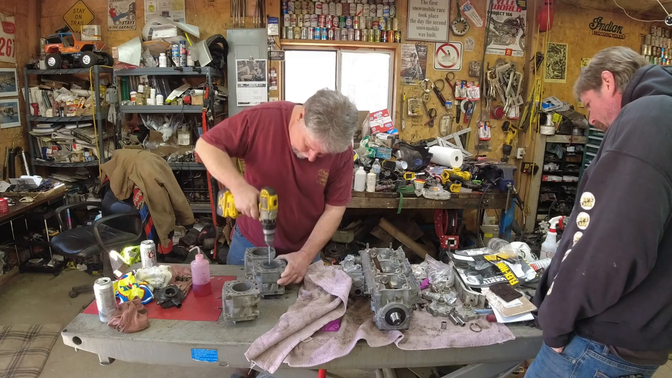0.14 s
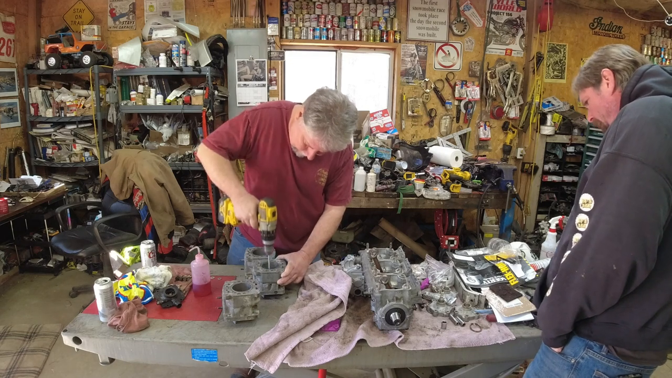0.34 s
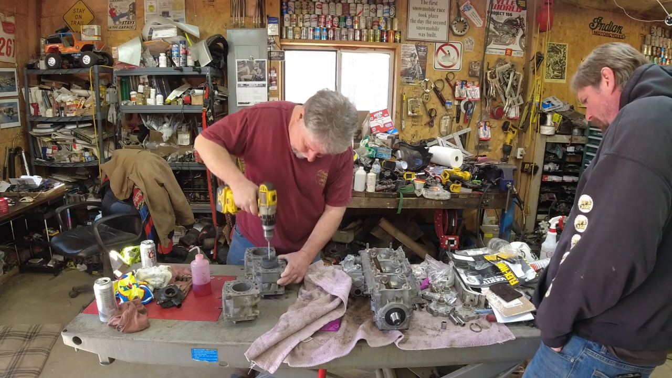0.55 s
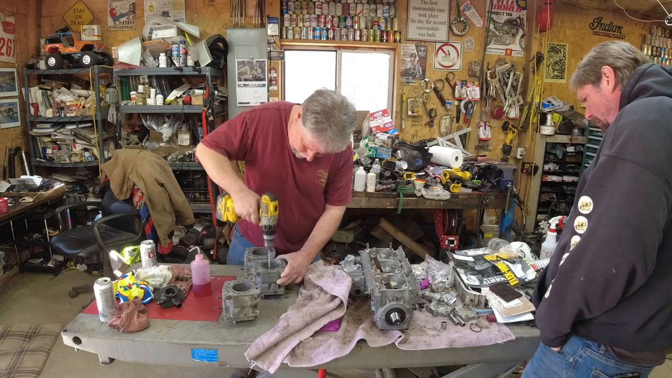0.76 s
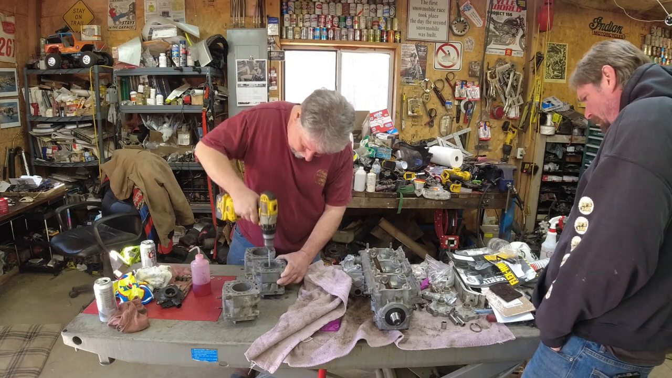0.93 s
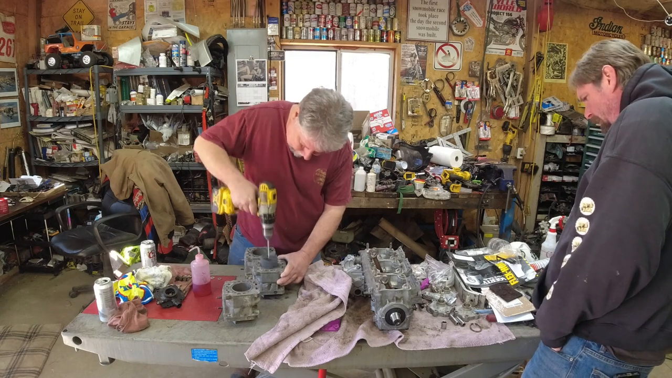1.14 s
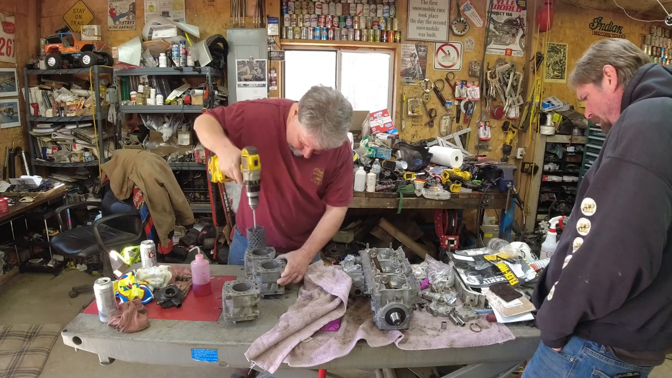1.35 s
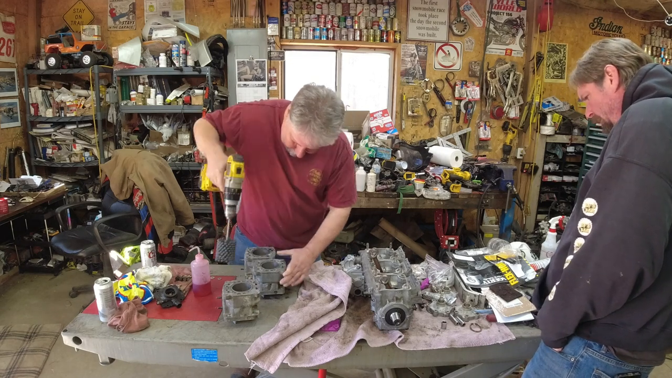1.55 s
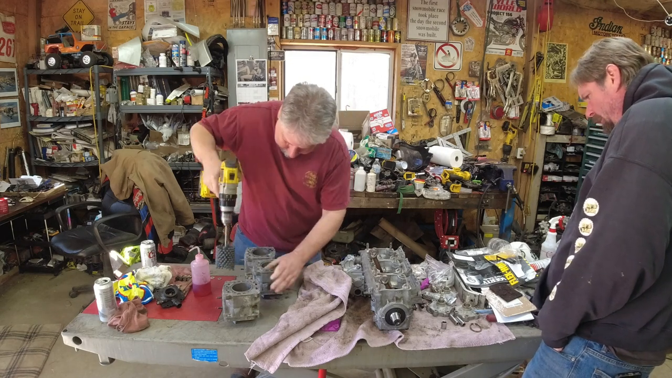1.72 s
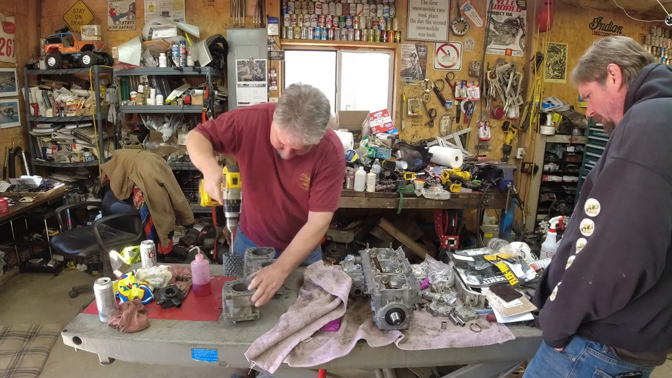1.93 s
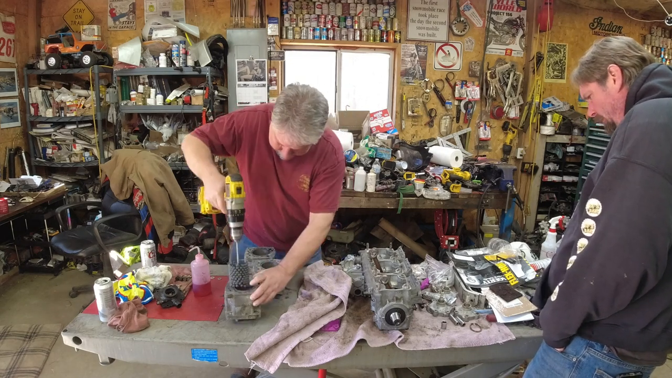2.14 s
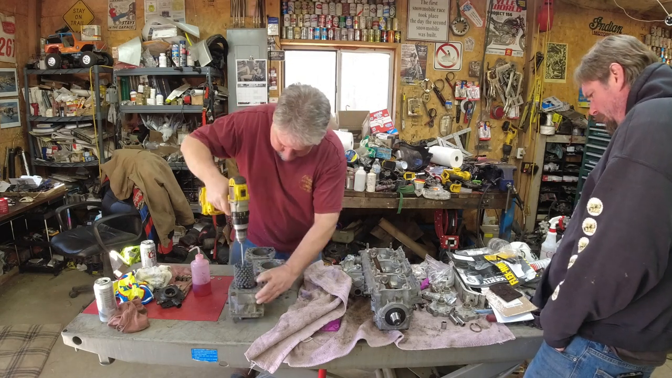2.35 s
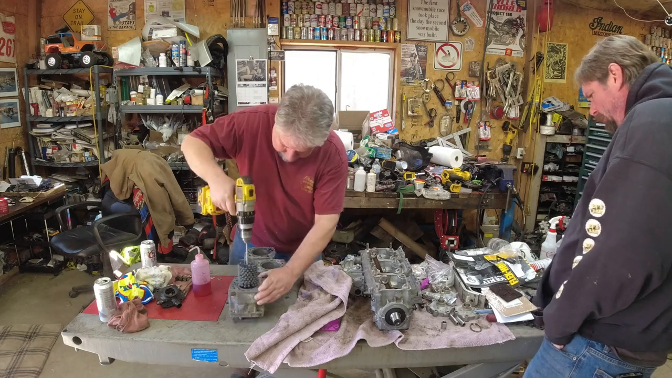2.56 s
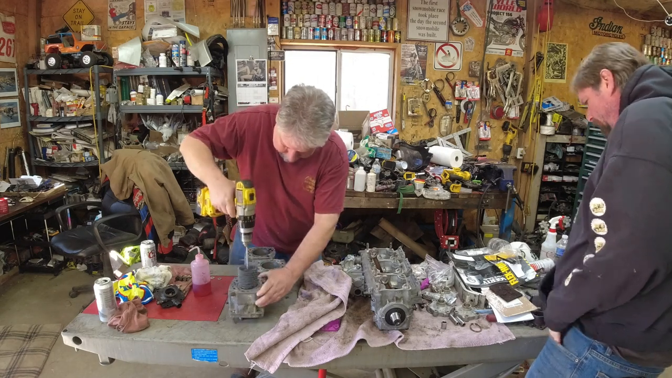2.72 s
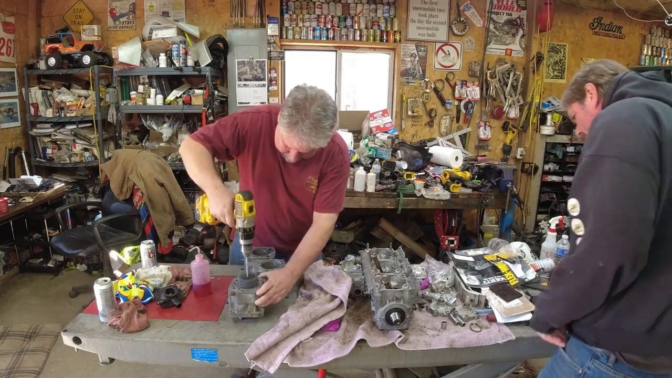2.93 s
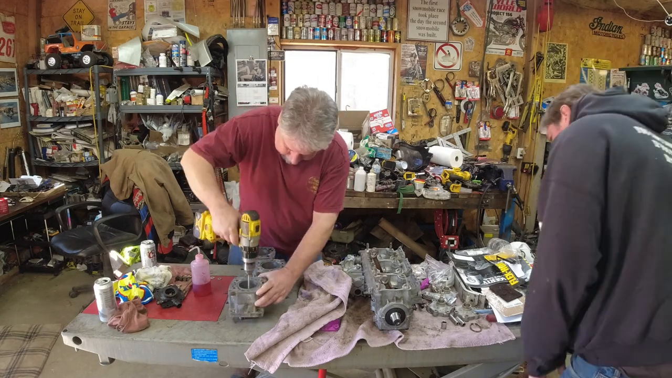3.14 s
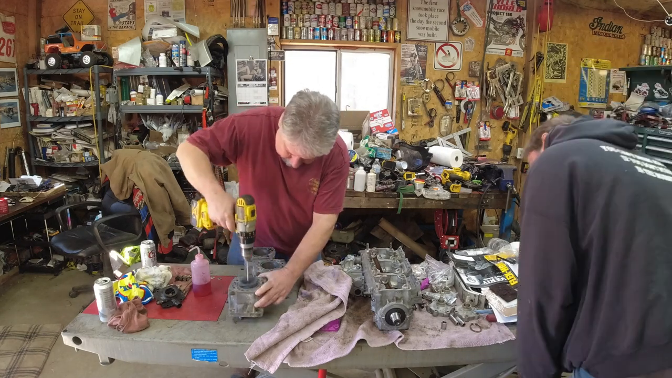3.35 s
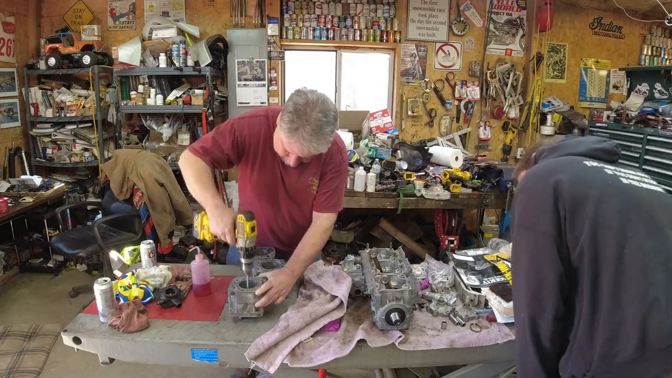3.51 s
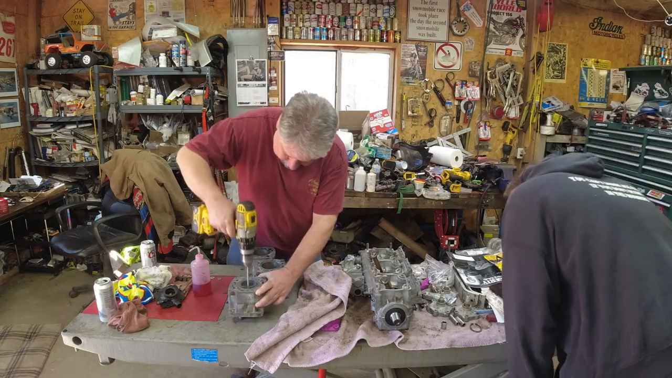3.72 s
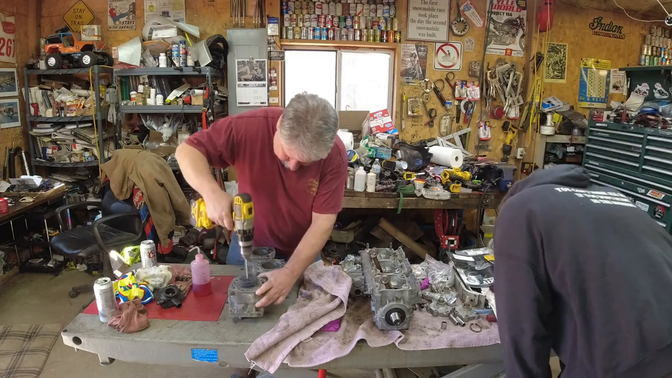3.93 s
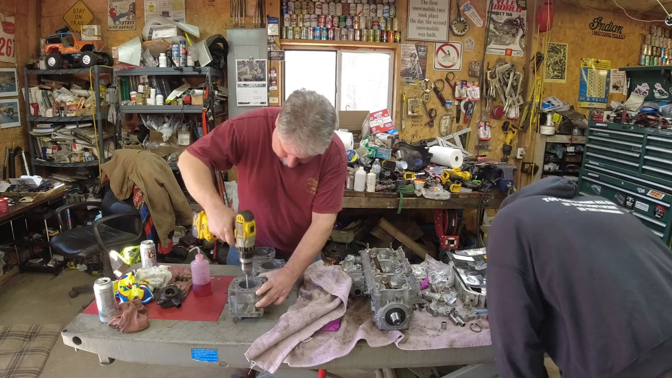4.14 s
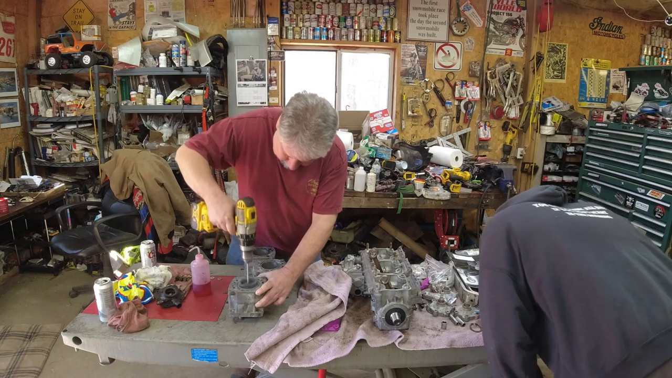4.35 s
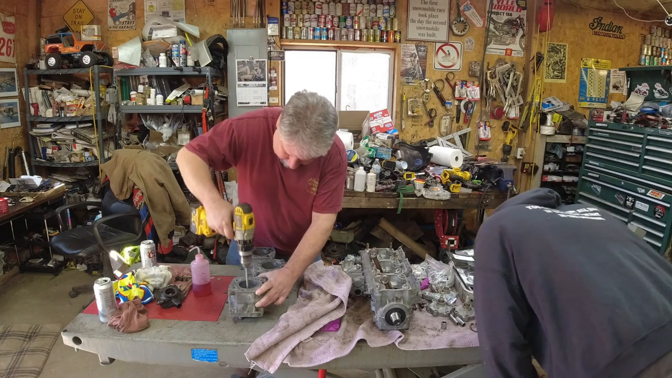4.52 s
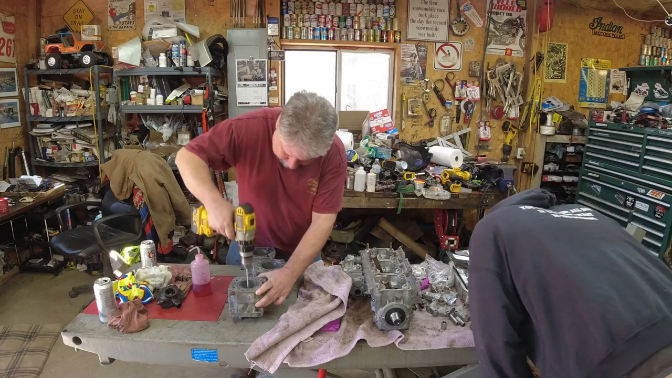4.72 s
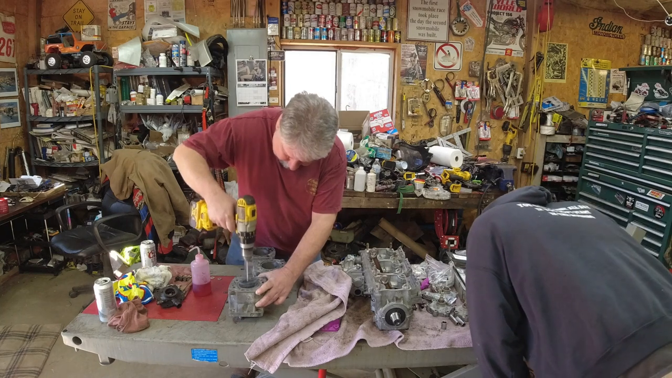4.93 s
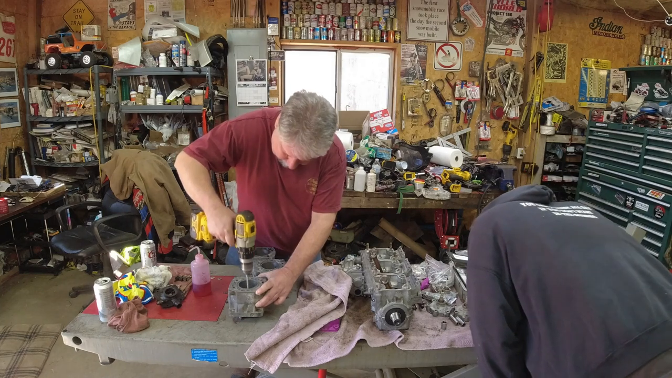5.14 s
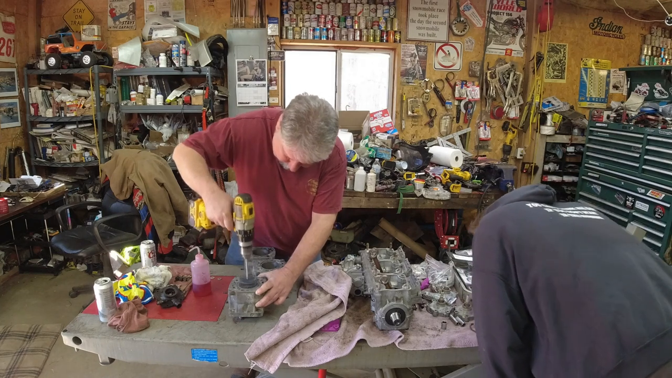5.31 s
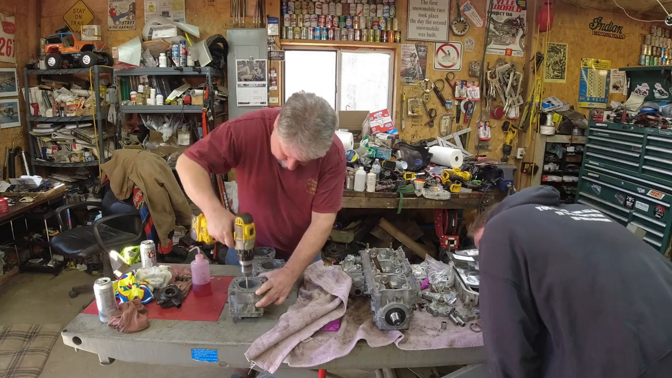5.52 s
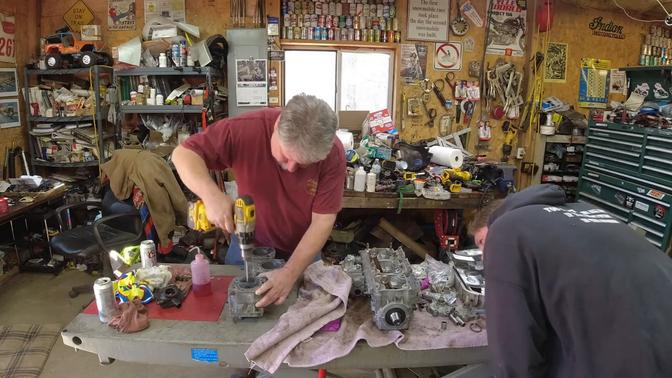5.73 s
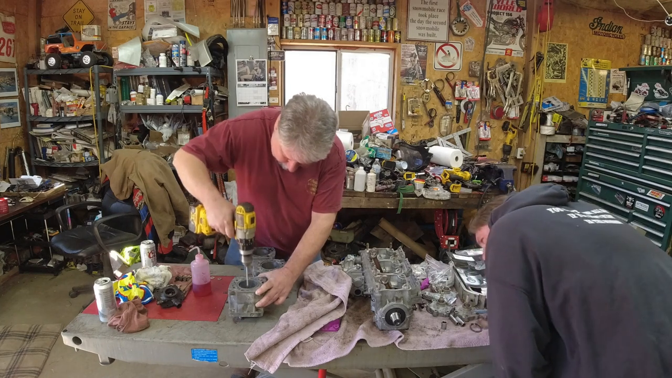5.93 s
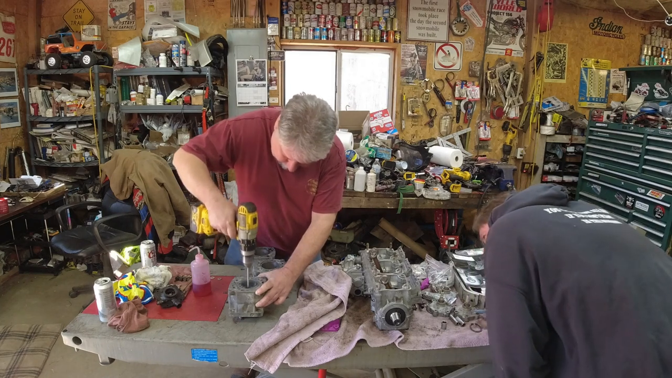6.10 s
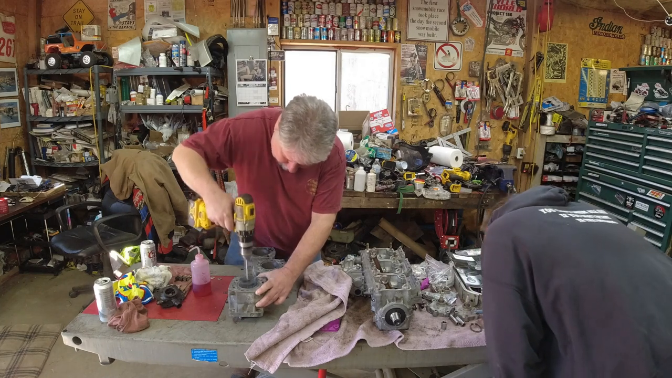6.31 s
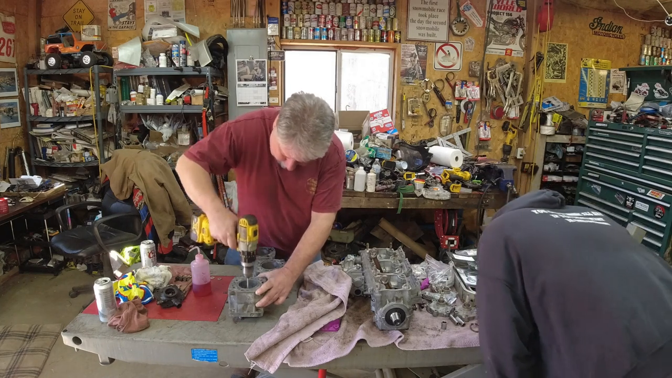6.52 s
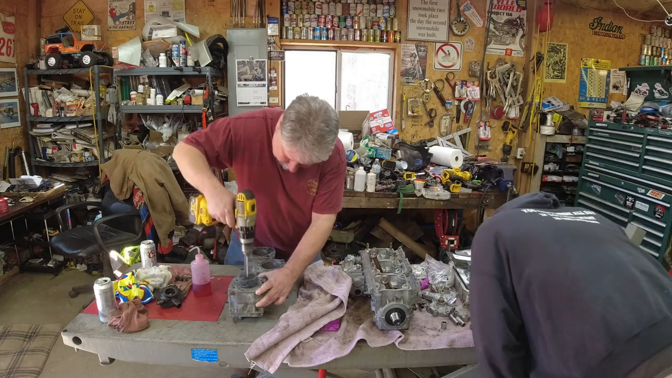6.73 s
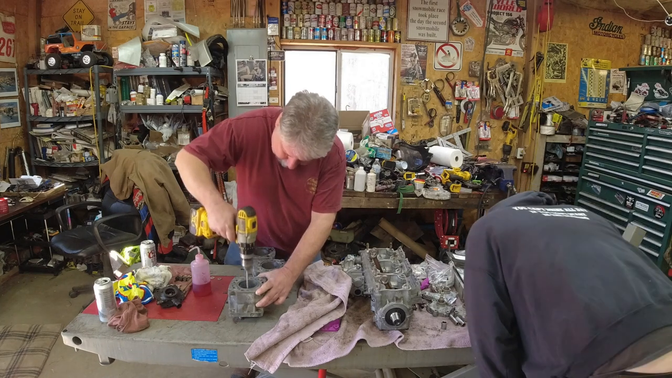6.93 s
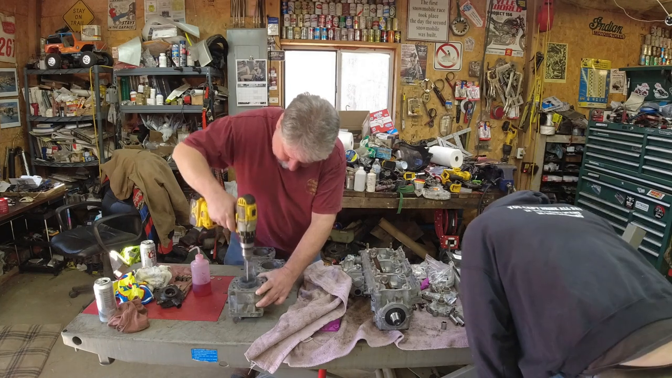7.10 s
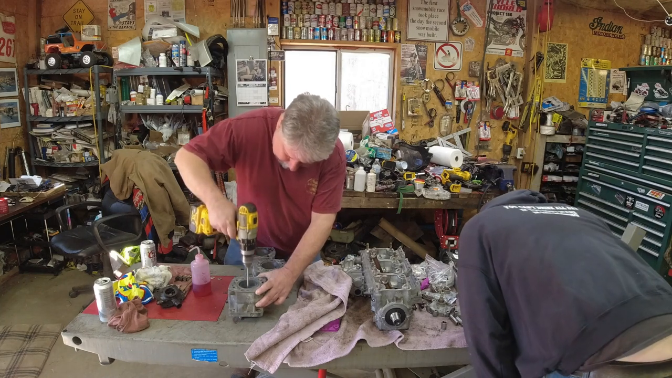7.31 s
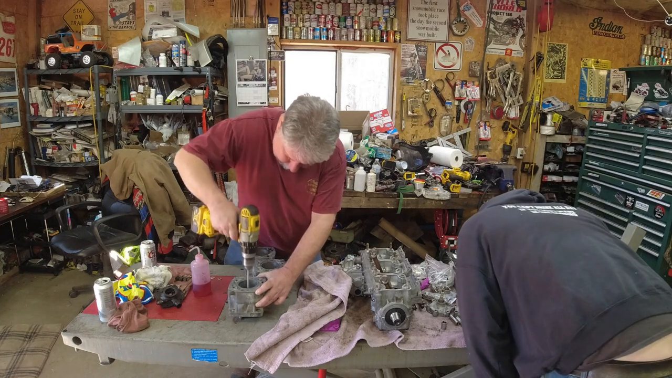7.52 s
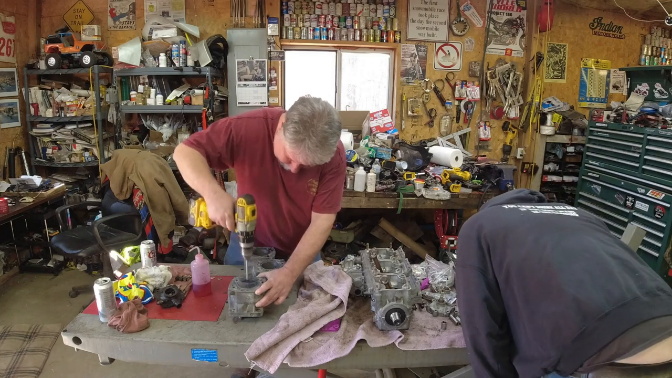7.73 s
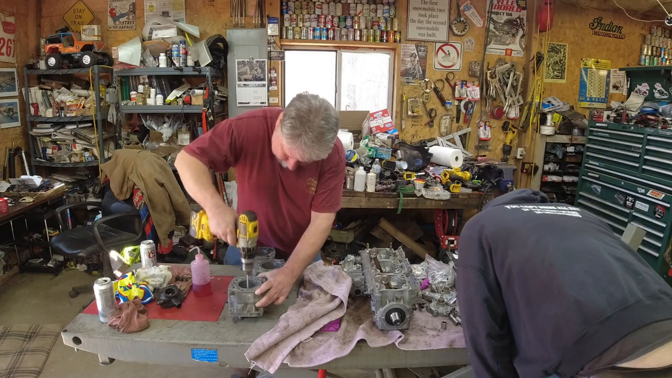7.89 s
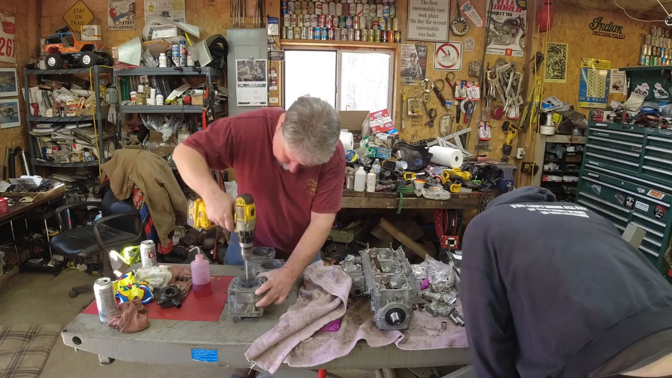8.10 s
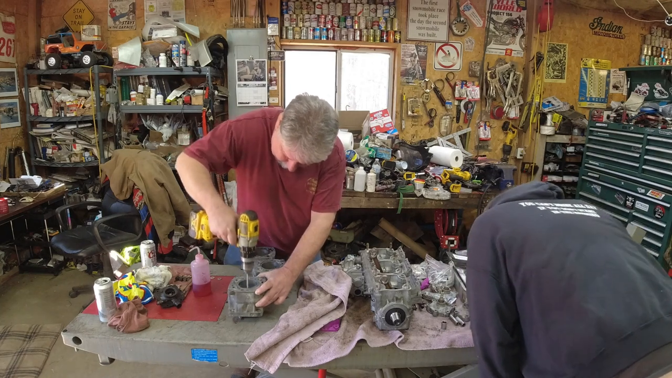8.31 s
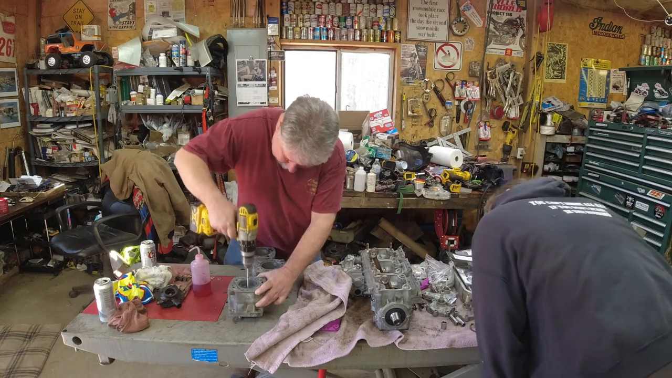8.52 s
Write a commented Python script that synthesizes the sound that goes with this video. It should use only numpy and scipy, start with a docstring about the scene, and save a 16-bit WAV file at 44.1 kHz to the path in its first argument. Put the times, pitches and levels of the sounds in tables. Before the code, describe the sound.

From 0 to 1.4 seconds a cordless drill runs already at speed, its gear whine and tooth rattle rising and sagging with quick strokes. An abrasive bead hone hisses brightly inside a metal cylinder, scraping the wall and shaking the bench; the hiss fades as it is drawn out. At 1.4 the motor brakes with a tight run of clacks. Near quiet follows, with very faint clinks and soft low rocking. Around 2.3 to 2.5 the cylinder is shoved with a short low juddering scrape, followed by light touches. At 2.9 a small clack and a rattling spin-up restart the drill. Until about 8.8 the honing continues, roughly three strokes a second, the motor bogging and recovering, with raspy catches and occasional tiny high chirps from 4.2 to 8. Short, sparse garage reflections and faint room air surround the close, bright sound.

```python
"""In a garage, a cordless drill pumps a ball hone up and down an engine cylinder on a bench.
Gear tones and tooth rattle follow a motor speed that sags at every turn of the stroke.
Random bead impacts hiss and ring on the bore, scrape its wall and shake the bench.
The drill brakes with a clatter, the loose hone clinks, the cylinder is shoved, and the honing resumes.
Sparse reflections and quiet room air surround it."""
import sys
import numpy as np
from scipy import signal
from scipy.fft import rfft, irfft, next_fast_len
from scipy.io import wavfile
from scipy.ndimage import uniform_filter1d

SR = 44100
rng = np.random.default_rng(int(sys.argv[2]) if len(sys.argv) > 2 else 0)


def generate_wav(sig):
    """Save sig (samples, or channels by samples) to the path in sys.argv[1] as 16-bit PCM at SR."""
    pcm = np.round(np.clip(np.atleast_2d(sig).T, -1, 1) * 32767).astype(np.int16)
    wavfile.write(sys.argv[1], SR, pcm)


N = 381799
TIME = np.arange(N) / SR  # s


def amp(db):
    """Logarithmic level: decibels to amplitude gain."""
    return 10 ** (np.asarray(db) / 20)


def unit(x):
    """Power normalisation: scales to rms 1."""
    return x / np.sqrt(np.mean(x ** 2) + 1e-20)


def read(points, hz):
    """Spectral interpolation: reads a curve of (f/Hz, value) on a log-frequency axis."""
    f, value = np.transpose(points)
    return np.interp(np.log(hz + 1), np.log(f + 1), value)


def level(rows):
    """Amplitude envelope: gain over time from a curve of (t/s, level/dB)."""
    return amp(np.interp(TIME, *np.transpose(rows)))


def colour(x, points, size=4096):
    """Minimum-phase filtering: a causal response of unit energy with the given spectrum."""
    log_gain = np.log(amp(read(points, abs(np.fft.fftfreq(size, 1 / SR)))))
    taps = np.fft.ifft(np.exp(np.conj(signal.hilbert(log_gain)))).real
    return signal.oaconvolve(x, taps / np.linalg.norm(taps))[:N]


def wander(rate_hz):
    """Low-pass noise: smooth random motion of rms 1, mostly below the given rate."""
    size = next_fast_len(N)
    hz = np.fft.rfftfreq(size, 1 / SR)
    spectrum = rfft(rng.standard_normal(size)) / (1 + (hz / rate_hz) ** 4)
    return unit(irfft(spectrum, size)[:N])


def grains(per_s, spread_db):
    """Shot noise: random tiny impacts, a few of them large."""
    size = amp(spread_db * np.minimum(rng.exponential(1, N), 4))
    return unit(size * rng.choice([-1, 1], N) * (rng.random(N) < per_s / SR))


def ring(x, modes):
    """Modal resonance: drives damped modes of (f/Hz, bandwidth/Hz, level/dB)."""
    out = np.zeros(N)
    for hz, width, db in modes:
        out += amp(db) * unit(signal.lfilter(*signal.iirpeak(hz, hz / width, SR), x))
    return unit(out)


def bursts(rows, soft=0.098):
    """Amplitude gating: short swells from rows of (t/s, level/dB, length/s)."""
    out = np.zeros(N)
    for s, db, length in rows:
        swell = signal.windows.tukey(max(round(length * SR), 8), soft)
        out[round(s * SR):][:len(swell)] += amp(db) * swell
    return out


def shifting(x, patchy_db, size=7):
    """Wandering contact points: random time-frequency gain favours now some resonances, now others."""
    z = signal.stft(x, SR, nperseg=1024, noverlap=768)[2]
    patches = uniform_filter1d(rng.standard_normal(z.shape), size, axis=0)
    patches = unit(uniform_filter1d(patches, size, axis=1))
    return unit(signal.istft(z * amp(patchy_db * patches), SR, nperseg=1024, noverlap=768)[1][:N])


# Powered spans of the motor: trigger pulled t/s, trigger released t/s
POWERED_RUNS = [(-1, 1.418), (2.916, 8.8)]


def trigger(ramp_s=0.0152):
    """Switching: 1 while the motor is powered, with short linear ramps."""
    return sum(np.clip(np.minimum(TIME - on, off - TIME) / ramp_s + .5, 0, 1) for on, off in POWERED_RUNS)


def since_pull():
    """Onset clock: seconds since the trigger was last pulled."""
    pulls = np.array(POWERED_RUNS)[:, 0]
    return TIME - pulls[np.searchsorted(pulls[1:], TIME)]


# Hone strokes, each from a turn that bogs the motor down: t/s, rotation at the turn f/Hz,
# rotation in mid-stroke f/Hz, relative bore pressure level/dB, relative gear whine level/dB
STROKES = [(-.172, 295, 350, -1, -4), (.266, 318, 340, -2, -3), (.56, 297, 345, -2, -3),
           (.842, 268, 315, -3, -2), (1.175, 176, 280, -3.5, -2), (1.444, 240, 240, 0, -3),
           (2.916, 300, 306, 1, 1), (3.268, 235, 324, .5, 1), (3.61, 270, 330, .5, -.5),
           (3.952, 222, 333, 0, .5), (4.262, 225, 325, 0, -.5), (4.568, 145, 357, 1.5, 1),
           (4.878, 232, 320, .5, -.5), (5.31, 225, 328, -.5, -.5), (5.644, 175, 332, -1, -.5),
           (5.996, 205, 280, -2, -2), (6.304, 140, 322, .5, 0), (6.66, 190, 335, 1, -.5),
           (7.024, 148, 280, 0, -2), (7.348, 222, 297, -1, -1), (7.728, 258, 320, -.5, -1),
           (8.066, 208, 300, -1.5, -1), (8.394, 135, 322, 0, 0), (8.674, 230, 320, 0, -1)]
SAG_S, SAG_POWER = .2, 1.8  # labouring time on each side of a turn, and how pointed the sag is
SPIN_UP_S, START_SHARE = .026, .3  # time constant, and share of the speed present at the first kick


def motor_speed(size=900):
    """Load and inertia: rotation in Hz sags into each turn and is smoothed over size samples."""
    start, slow, fast = np.transpose(STROKES)[:3]
    k = np.searchsorted(start[1:-1], TIME)
    speed = fast[k]
    for turn in (k, k + 1):
        sag = np.maximum(1 - abs(TIME - start[turn]) / SAG_S, 0) ** SAG_POWER
        speed = speed - (fast[k] - slow[turn]) * sag
    spin_up = 1 - (1 - START_SHARE) * np.exp(-since_pull() / SPIN_UP_S)
    return uniform_filter1d(speed, size) * spin_up


def per_stroke(axis, size=2200):
    """Piecewise excitation: one stroke column over time, eased from each stroke to the next."""
    rows = np.asarray(STROKES)
    return uniform_filter1d(rows[np.searchsorted(rows[1:, 0], TIME), axis], size)


# Lifts of the hone partly out of the bore: least grip t/s, letting-go time/s, loss of grip level/dB
LIFTS = [(0.14, 0.049, 55), (0.446, 0.054, 30), (0.766, 0.04, 15.5), (1.213, 0.12, 23.5),
         (1.415, 0.085, 33), (3.004, 0.21, 45.5), (4.181, 0.032, 6.9), (4.61, 0.091, 12),
         (4.842, 0.051, 8.5), (5.192, 0.041, 2), (5.57, 0.033, 4.5), (5.666, 0.048, 7), (6.026, 0.057, 3),
         (6.359, 0.095, 15), (6.574, 0.041, 8.5), (6.695, 0.065, 5.5), (6.949, 0.059, 9.5),
         (7.063, 0.12, 14.5), (7.281, 0.047, 8), (7.636, 0.045, 6.5), (8.07, 0.134, 4), (8.439, 0.1, 10.5),
         (8.65, 0.04, 6)]
BITE_SHARE = 0.46  # the beads bite again in this share of the letting-go time


def slack():
    """Loss of contact in dB: at each lift the beads let go gradually and bite again more quickly."""
    loose = np.zeros(N)
    for s, length, db in LIFTS:
        side_s = np.where(TIME < s, length, BITE_SHARE * length)
        loose += db * np.exp(-((TIME - s) / side_s) ** 2)
    return loose


SURGE_S = 0.26  # how long the rattle runs loud after the trigger is pulled


def gear_levels(speed, full_hz=300, free_whine=.09, free_rattle=0.14, labour_db=9, surge_rattle_db=10.5,
                load_db=-3.74):
    """Load on the teeth: gears whine when light or labouring, and rattle under load and on starting."""
    loose = slack()
    surge = np.exp(-(since_pull() / SURGE_S) ** 2)
    whine = per_stroke(axis=4) + free_whine * loose + labour_db * (1 - speed / full_hz)
    rattle = load_db - free_rattle * loose + surge_rattle_db * surge
    return amp(whine), amp(rattle)


# Gear and motor tones: f/rotation, relative level/dB, unsteadiness/1
ORDERS = [(.7, -59.5, .4), (3.5, -55.5, .51), (4.03, -51.5, .4), (7, -60.5, .9), (7.5, -61, .62),
          (7.95, -46.5, .3), (13.3, -59, 1.9), (16, -49.5, .6)]
# Radiation efficiency of the housing for tones: f/Hz, level/dB
RADIATION = [(150, -3.5), (550, 2.5), (950, 0.5), (1200, 1.5), (1380, -5), (1750, 1), (2300, -2.5),
             (2850, 2.5), (3400, 12), (4600, -2), (4880, 1.5), (5200, -18), (5450, -15.5)]
SOFTENING = .42  # how quickly the high gear tones fade as the motor slows


def gear_whine(speed, turns, pace):
    """Order tones: tooth and motor vibrations at fixed multiples of the rotation."""
    whine = np.zeros(N)
    for order, db, shake in ORDERS:
        swell = 1 + shake * wander(45)
        tone = unit(swell * np.cos(2 * np.pi * order * turns + shake * wander(35) / pace))
        # slow teeth meet softly, so the high tones fade first
        softness = np.minimum(pace, 1) ** (SOFTENING * order)
        whine += amp(db + read(RADIATION, order * speed)) * softness * tone
    return whine


# Spectrum of the rattling drill housing: f/Hz, relative level/dB
HOUSING = [(100, -33.5), (300, -10), (800, -10), (1500, -22), (2200, 3.5), (3200, 9.5), (4600, 3.5),
           (5600, -14.5), (7000, -7.5), (10500, -25.5), (15500, -25)]
RATTLE_POWER = 1.2  # the rattle grows as this power of the motor speed


def tooth_rattle(turns, pace, rattle_db=-42, tooth_depth=0.75):
    """Impact excitation: meshing teeth strike the housing, modulated once a turn and harder at speed."""
    teeth = grains(9000, 2.6) * (1 + tooth_depth * np.cos(2 * np.pi * turns))
    return amp(rattle_db) * colour(unit(teeth), HOUSING) * pace ** RATTLE_POWER


def drill(speed, full_hz=300, jitter=.004):
    """Rotating-machine noise: whine and rattle share one unsteady rotation."""
    pace = speed / full_hz
    # a labouring motor runs less evenly
    turns = np.cumsum(speed * (1 + jitter * wander(60.2) / pace ** 2)) / SR
    whine_gain, rattle_gain = gear_levels(speed)
    return gear_whine(speed, turns, pace) * whine_gain + tooth_rattle(turns, pace) * rattle_gain


# Catches of the head on the bore: t/s, rise of the scraping level/dB, easing time/s
CATCHES = [(.47, 0, 0.037), (.785, 0, 0.02), (3.158, 2.5, 0.061), (3.355, 1.5, .05), (3.665, 1.5, .07),
           (4.035, 4.5, 0.026), (4.335, 3, 0.074), (4.87, 1, 0.055), (5.23, -1, 0.034), (5.465, 3, .04),
           (5.735, 4, 0.064), (6.055, 4, 0.07), (6.41, 0, 0.045), (6.74, 6, 0.019), (7.1, 7, 0.018),
           (7.31, 0.5, .04), (7.43, 4, 0.053), (7.685, -0.5, .04), (7.775, 3, 0.1), (8.18, 5, 0.03),
           (8.463, 8.5, .04)]
DIG_S = .012  # time a catch takes to build


def digging():
    """Transient contact force in dB: each catch builds quickly and eases off."""
    dig = np.zeros(N)
    for s, db, ease in CATCHES:
        dig += db * np.clip((TIME - s) / DIG_S, 0, 1) * np.exp(-((TIME - s) / ease) ** 2)
    return dig


BITE_DB_PER_S = 135.5  # rate of change of grip that scales the jolt


def contact_levels(hiss_db=-33.5, hiss_dig=0.72, rasp_db=-34.0, rasp_drop_db=15, rasp_knee_db=24,
                   rasp_jolt_db=1.5, shake_db=-46.0, shake_drop_db=6, shake_dig=1.1, shake_jolt_db=0.5,
                   shake_lull_db=7, lurch_db=2.6, lurch_hz=12):
    """Contact force: gains of hiss, rasp and bench shake follow pressure, lost grip, jolts and catches."""
    press, loose, dig = per_stroke(axis=3), slack(), digging()
    free = np.tanh(loose / rasp_knee_db)
    # positive as the beads bite, negative as they let go
    jolt = np.tanh(-np.gradient(loose) * SR / BITE_DB_PER_S)
    hiss = hiss_db + press - loose + hiss_dig * dig
    rasp = rasp_db + press - rasp_drop_db * free + rasp_jolt_db * jolt + dig
    shake_jolt = np.where(jolt > 0, shake_jolt_db, shake_lull_db) * jolt
    shake = shake_db + press - shake_drop_db * free + shake_jolt + shake_dig * dig
    return amp(hiss), amp(rasp), amp(shake + lurch_db * wander(lurch_hz))


# Spectrum of the bead hiss: f/Hz, relative level/dB
BEADS = [(4500, -24.5), (6500, -33), (7400, -11.5), (8100, -3.5), (8600, -8), (9600, 3), (11200, 3.5),
         (12200, 3.5), (13100, -6.5), (14000, -1), (15900, -9)]
# Modes of the bore liner: f/Hz, bandwidth/Hz, relative level/dB
LINER = [(9770, 150, -6.5), (10740, 500, 0.5), (10850, 55, 7), (12500, 120, -5.5), (12840, 110, 0.5),
         (15660, 60, -16)]


def bead_hiss(pressure, beads_db=-1.5, liner_db=-3, squeak_db=1.5):
    """Stick-slip friction: bead slips hiss and ring the liner's modes."""
    slips = pressure * grains(16000, 3.1)
    hiss = amp(beads_db) * colour(shifting(slips, patchy_db=4.5), BEADS)
    squeak = amp(liner_db) * ring(slips * amp(squeak_db * wander(60)), LINER)
    return hiss + squeak


# Spectrum of scraping on the cylinder wall: f/Hz, relative level/dB
WALL = [(400, -30.5), (700, -18), (1200, -14), (1520, -14.5), (1820, -15), (1980, -10), (2280, -7),
        (2750, -12), (3150, -8.5), (3400, -4.5), (3750, -0.5), (4310, 8.5), (4750, -16.5), (5200, -4.5),
        (5900, -17.5), (8000, -37.5)]
# Modes of the cylinder's casting: f/Hz, bandwidth/Hz, relative level/dB
CASTING = [(1843, 79, -13.5), (2294, 110, -5.5), (3464, 88, -8), (4306, 130, 4), (5260, 29, -18.5)]


def wall_rasp(pressure, wall_db=-3.0, casting_db=-6):
    """Forced wall vibration: scrapes excite the cylinder wall and its casting."""
    scrapes = shifting(pressure * grains(7000, 2.5), patchy_db=2.5)
    return amp(wall_db) * colour(scrapes, WALL) + amp(casting_db) * ring(scrapes, CASTING)


# Bench spectra, one for each place where the cylinder stands: f/Hz, relative level/dB
BENCH_PLACES = [
    [(30, -34.5), (70, -23), (108, 2.5), (175, 4.5), (215, -8), (240, -2.5), (315, -18.5), (415, -1.5),
     (530, -13.5), (625, -7), (690, -12), (830, -7), (1000, -18), (1400, -31)],
    [(30, -37), (80, -20), (125, -13), (185, 1), (225, -1), (282, -14.5), (345, -3.5), (470, -5),
     (570, -12.5), (622, -1), (680, -18.5), (850, -8.5), (1000, -10.5), (1400, -24.5)],
]
# Main boom of the bench, one row for each place: f/Hz, bandwidth/Hz, relative level/dB
BENCH_BOOMS = [(116, 14, -13), (203, 15, -14.5)]


def bench_shake(pressure, bench_db=-3.5):
    """Structure-borne sound: coarser knocks pass through the cylinder into the bench."""
    knocks = pressure * grains(2000, 1.6)
    places = []
    for body, (hz, width, db) in zip(BENCH_PLACES, BENCH_BOOMS):
        boom = amp(db) * ring(knocks, [(hz, width, 0)])
        places.append(amp(bench_db) * colour(knocks, body) + boom)
    # the second place applies from the start of the shove
    return np.where(TIME < SHOVE[0][0], *places)


# Chirps of the liner as a bead sticks: t/s, relative level/dB, length/s
CHIRPS = [(4.232, -32, .008), (4.871, -29, 0.0075), (4.995, -38, 0.0088), (5.217, -30, 0.013),
          (6.421, -27.5, 0.0078), (6.59, -29, 0.0076), (6.761, -29, 0.0077), (7.222, -26, 0.0063),
          (7.303, -31, 0.015), (7.797, -30, 0.0067), (8.024, -34, 0.0095)]


def liner_chirps():
    """Mode locking: a sticking bead locks onto the liner's strongest mode."""
    phase = 2 * np.pi * LINER[2][0] * TIME + 1.0 * wander(150)
    return bursts(CHIRPS) * unit(np.sin(phase))


def hone(speed, gearing=18.0, swing_db=-0.52, chatter_db=-0.13):
    """Frictional excitation: bead pressure on the bore swings with each turn of the chuck."""
    hiss_gain, rasp_gain, shake_gain = contact_levels()
    chuck = 2 * np.pi * np.cumsum(speed) / SR / gearing
    pressure = unit(amp(swing_db * np.sin(chuck) + chatter_db * wander(220)))
    bore = bead_hiss(pressure) * hiss_gain + wall_rasp(pressure) * rasp_gain
    return bore + bench_shake(pressure) * shake_gain + liner_chirps()


def stem(ring_hz=5140, width_hz=60, ring_db=-51.0, fade_s=1.2, fade_len_s=0.19):
    """Narrow-band resonance: the wire stem sings thinly until the head is drawn out of the bore."""
    inside = np.clip((fade_s - TIME) / fade_len_s + .5, 0, 1)
    return amp(ring_db) * inside * ring(grains(6200, 2.1), [(ring_hz, width_hz, 0)])


# Spectrum of the still room air: f/Hz, relative level/dB
AIR = [(25, -5), (58, -5.5), (80, 0), (120, -1.5), (250, -9.5), (490, -9), (720, -18), (1200, -14.5),
       (1700, -31), (4300, -36.5), (6500, -43), (10600, -26.5), (15000, -49.5)]
# Soft rocking of the bench: t/s, relative level/dB, length/s
RUMBLE = [(1.8, -58.5, 0.26), (7.08, -65, .5)]


def background(air_db=-79):
    """Broadband noise: steady quiet room air and swells of low rumble as the bench rocks."""
    rumble_hz = [(8, -10.0), (17, -3), (35, -3), (60, -12), (110, -22.0), (400, -52.0), (2000, -83)]
    rocking = colour(rng.standard_normal(N), rumble_hz)
    return amp(air_db) * colour(rng.standard_normal(N), AIR) + rocking * bursts(RUMBLE, soft=0.45)


# Reverberation of the garage: f/Hz, sixty-decibel decay time/s
GARAGE = [(150, 0.12), (600, 0.23), (2000, 0.13), (4000, 0.13), (10000, 0.12), (16000, 0.39)]


def tail(size=24000, spacing=20):
    """Reverberation: sparse reflections off cluttered walls, each band dying at its own rate."""
    taps = np.zeros(size)
    at = np.arange(6 * spacing, size - spacing, spacing)
    taps[at + rng.integers(0, spacing, len(at))] = rng.choice([-1., 1.], len(at))
    hz, t, z = signal.stft(taps, SR, nperseg=256)
    decay = amp(-60 * t / read(GARAGE, hz)[:, None])
    out = signal.istft(z * decay, SR, nperseg=256)[1]
    return out / np.linalg.norm(out)


def reflections(x, speed, stroke_hz=110):
    """Varying source-room coupling: two echo patterns trade shares as the motor speed changes."""
    angle = speed / stroke_hz
    return sum(signal.oaconvolve(x * share, tail())[:N] for share in (np.cos(angle), np.sin(angle)))


# Clacks of the drive train, braking and starting: t/s, chuck ring level/dB, case knock level/dB,
# both before the common gains
CLACKS = [(1.414, -17, -19.5), (1.4232, -35, -43.5), (1.429, -25, -21.5), (1.438, -27, -24),
          (1.444, -25, -24), (1.447, -21, -28), (1.455, -22, -13), (1.459, -29, -34), (1.4653, -22.5, -33),
          (1.472, -32, -27), (2.878, -50, -58), (2.887, -45, -54), (2.895, -47, -50), (2.9022, -25.5, -32),
          (2.917, -44, -27)]


def blows(axis, buzz_db=-22, buzz_s=0.0066, lead_s=0.0011, size=2400):
    """Impulsive force: at each clack the teeth graze, strike and buzz briefly."""
    force = np.zeros(N)
    strike = size // 10
    t = (np.arange(size) - strike) / SR
    for row in CLACKS:
        blow = amp(buzz_db) * rng.standard_normal(size) * np.exp(-np.maximum(t / buzz_s, -t / lead_s))
        blow[strike] += 1
        force[round(row[0] * SR) - strike:][:size] += amp(row[axis]) * blow
    return force


# Modes of the chuck: f/Hz, bandwidth/Hz, relative level/dB
CHUCK = [(3240, 350, 6), (3900, 530, 3.5), (4480, 150, 7), (8200, 700, -20)]
# Spectrum of a knock on the drill's case: f/Hz, relative level/dB
CASE_KNOCK = [(150, -45.5), (450, -3.5), (1000, 4), (1500, -4), (2100, 8), (2600, -2), (3400, -7),
              (4500, -9), (5400, -27), (8000, -28.5), (15000, -29.5)]


def clacks(ring_db=19, knock_db=6):
    """Impulse response: each clack rings the steel chuck and knocks the plastic case."""
    force = blows(axis=1)
    steel = np.zeros(N)
    for k, (hz, width, db) in enumerate(CHUCK):
        mode = signal.lfilter(*signal.iirpeak(hz, hz / width, SR), force)
        steel += (-1) ** k * amp(db) * mode  # neighbouring modes move in opposite phase
    return amp(ring_db) * steel + amp(knock_db) * colour(blows(axis=2), CASE_KNOCK)


# Faint clinks of the loose hone: t/s, relative level/dB, length/s, f/Hz
CLINKS = [(1.563, -80.5, 0.067, 2230), (1.728, -83, .05, 1300), (1.86, -91, .04, 1680),
          (1.968, -80, .06, 1300), (2.19, -78.5, 0.07, 1320)]


def clinks(width_hz=130):
    """Damped resonance: the hone's wire stem quivers as it is lifted clear."""
    out = np.zeros(N)
    for s, db, length, hz in CLINKS:
        quiver = ring(rng.standard_normal(N), [(hz, width_hz, 0)])
        out += bursts([(s, db, length)], soft=0.5) * quiver
    return out


# Brushes of hand and hone on the cylinder: t/s, relative level/dB, rise/s, decay/s
TOUCHES = [(1.688, -78, .02, 0.034), (2.02, -82, 0.036, 0.16), (2.299, -58.5, .014, 0.092),
           (2.396, -66, .004, 0.026), (2.615, -69, 0.013, .012), (2.698, -61.5, 0.0051, 0.049),
           (2.76, -72, 0.022, 0.11), (2.832, -57.5, .012, 0.02), (2.88, -69, 0.018, 0.017)]
# Spectrum of a brush: f/Hz, relative level/dB
TOUCH = [(60, -21), (190, 17.5), (350, 0), (800, 4.5), (1600, -3), (4200, -2.5), (6500, -25), (11000, -9),
         (15000, -39)]


def brushes():
    """Rubbing noise: light contacts swell linearly and decay exponentially."""
    contact = np.zeros(N)
    for s, db, rise, decay in TOUCHES:
        swell = np.clip((TIME - s) / rise, 0, 1)
        contact += amp(db) * swell * np.exp(-np.maximum(TIME - s - rise, 0) / decay)
    return colour(contact * grains(5000, 2.3), TOUCH)


# Shove of the cylinder across the bench: t/s, relative level/dB
SHOVE = [(2.25, -75), (2.3, -56.5), (2.316, -39.5), (2.35, -45.5), (2.385, -49.5), (2.42, -46.5),
         (2.465, -51), (2.49, -64), (2.53, -75)]
# Modes of the bench top under the cylinder: f/Hz, bandwidth/Hz, relative level/dB
BENCH_TOP = [(110.4, 24, -6), (186, 46, -4), (226, 31, 5), (335, 63, -3.5), (463, 24, 2), (620, 22, -4),
             (706, 33, 2), (760, 46, -17), (874, 20, -30), (1180, 180, 4)]


def shove():
    """Sliding friction: the cylinder's base judders over the resonant bench top."""
    body = [(50, -28), (110, 6.5), (850, -1.5), (1600, -17.5), (5000, -29)]
    judder = colour(ring(grains(700, 2.0), BENCH_TOP), body)
    sliding = (TIME > SHOVE[0][0]) & (TIME < SHOVE[-1][0])
    return unit(judder) * level(SHOVE) * sliding


# Spread of the reflections between the ears: f/Hz, side-signal gain level/dB
WIDTH = [(60, -19.5), (160, -57), (300, -28), (600, -19), (1200, -15.5), (2400, -7.5), (4400, -6.5),
         (7200, 5), (8800, -11), (10800, -20.5), (13000, -13.5), (15500, -27)]


def scene(wet_db=-6):
    """Superposition: direct sound is centred; the side reflections alone differ between the ears."""
    speed = motor_speed()
    powered = trigger() * (drill(speed) + hone(speed) + stem())
    dry = powered + background() + clacks() + clinks() + brushes() + shove()
    mid = (dry + amp(wet_db) * reflections(dry, speed)) / np.hypot(1, amp(wet_db))
    size = next_fast_len(N)
    spread = amp(read(WIDTH, np.fft.rfftfreq(size, 1 / SR)))
    side = irfft(rfft(reflections(dry, speed), size) * spread, size)[:N]
    return np.array([mid + side, mid - side])


# Spectrum of the microphones' own hiss: f/Hz, relative level/dB
MICROPHONE_HISS = [(25, 5.5), (200, -11), (800, -8.5), (1400, -3.5), (2500, -10.5), (4300, -9),
                   (5600, -16.5), (7000, -21.5), (11000, -14.5), (15000, -40)]
EDGE_HZ = 15760  # upper band limit


def record(dry, hiss_db=-82):
    """Self-noise and band limiting: each microphone adds its own faint hiss before a steep low-pass."""
    hiss = amp(hiss_db) * np.array([colour(rng.standard_normal(N), MICROPHONE_HISS) for _ in dry])
    taps = signal.firwin(801, EDGE_HZ, window=("kaiser", 9), fs=SR)
    return signal.oaconvolve(dry + hiss, taps[None], "same")


dry = scene()
out = record(dry)
generate_wav(out)
```